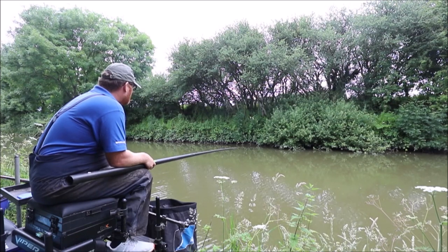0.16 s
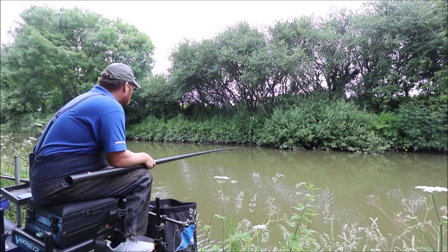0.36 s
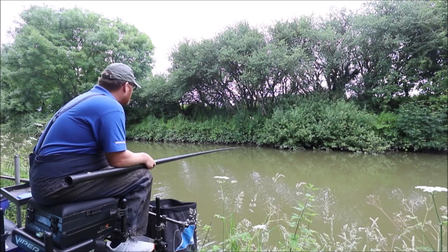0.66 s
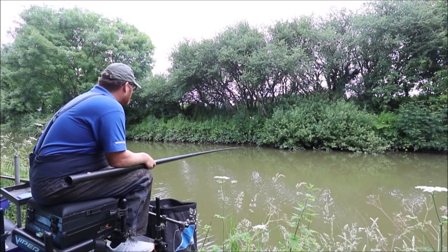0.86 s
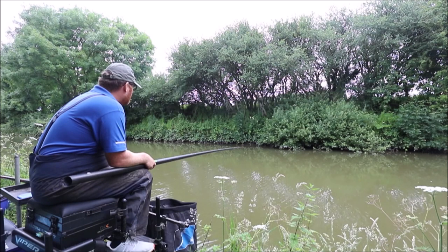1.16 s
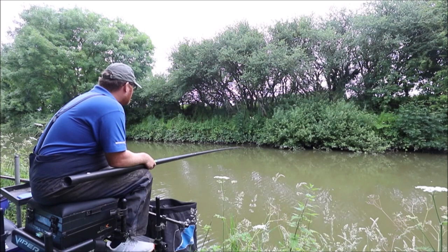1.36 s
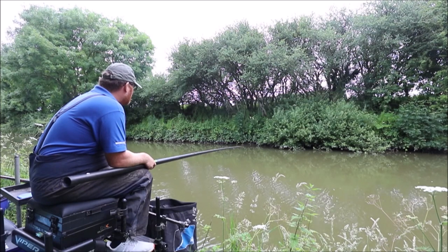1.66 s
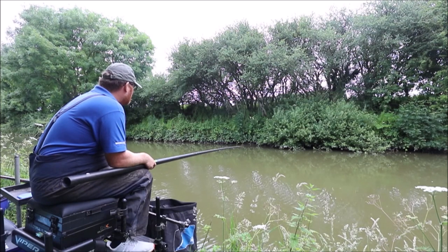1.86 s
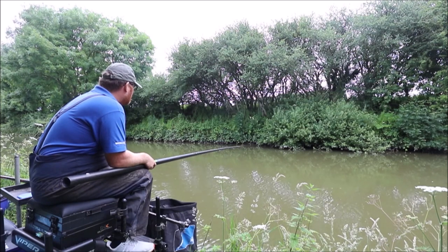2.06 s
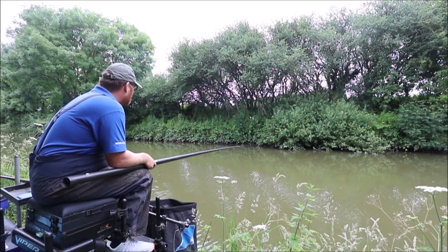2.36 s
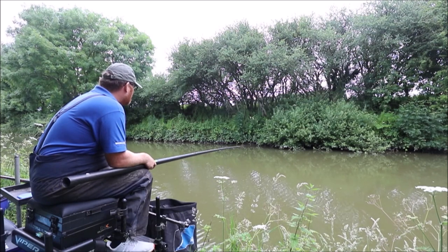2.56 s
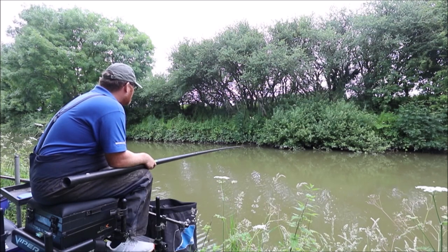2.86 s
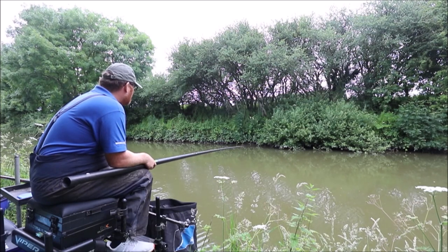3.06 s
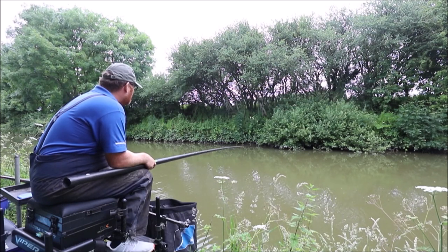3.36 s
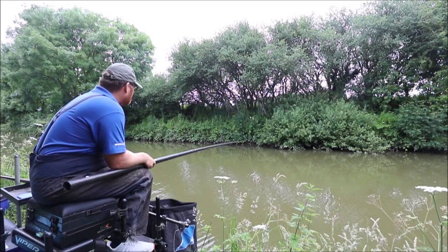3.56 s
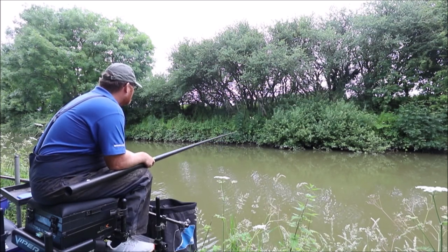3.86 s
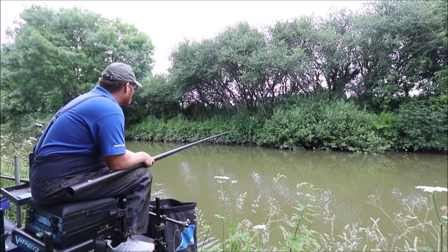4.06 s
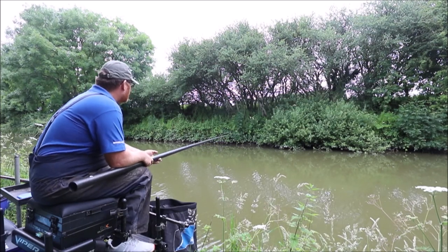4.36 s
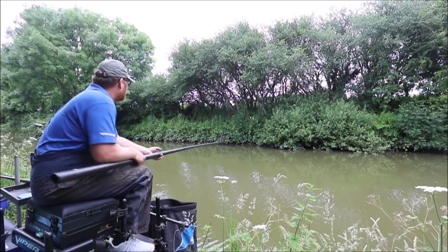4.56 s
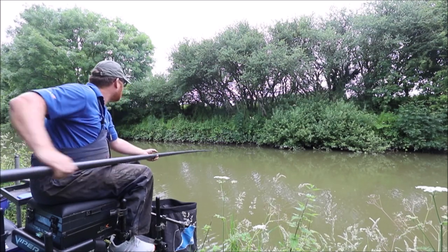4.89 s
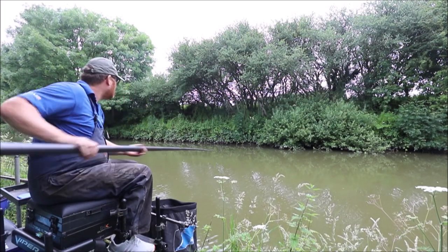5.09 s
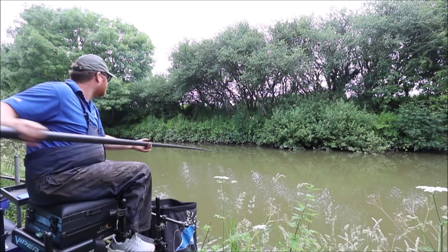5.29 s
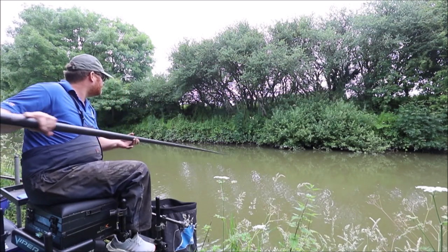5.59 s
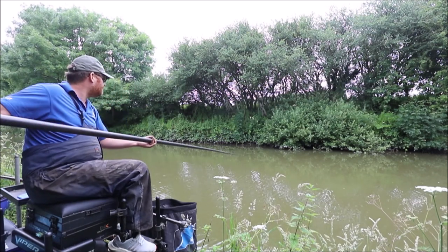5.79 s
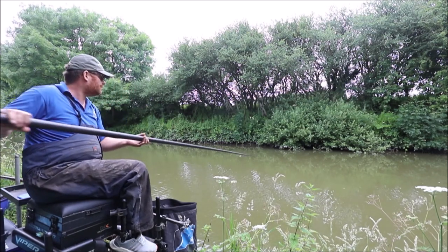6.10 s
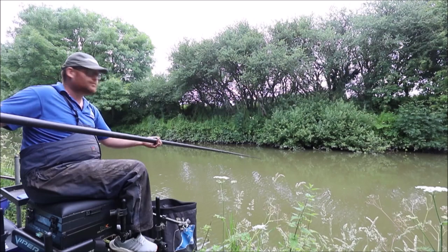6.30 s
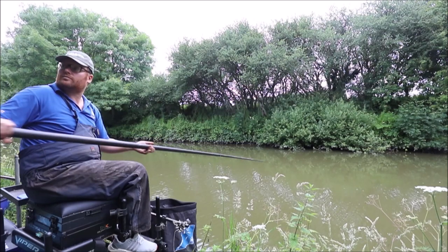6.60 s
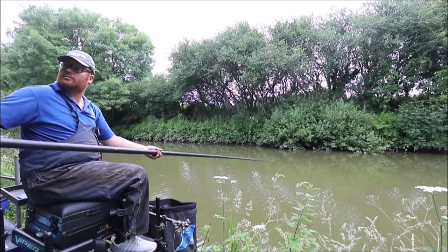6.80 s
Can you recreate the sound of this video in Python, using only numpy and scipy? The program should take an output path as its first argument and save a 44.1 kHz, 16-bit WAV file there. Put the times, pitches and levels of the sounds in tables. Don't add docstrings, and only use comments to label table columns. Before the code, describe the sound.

A quiet waterside with faint, steady far traffic, low rumble and a light breeze in leaves. From 0 to 0.9 s a small songbird gives short chirps, faint clicks, a lower whistle and high sliding notes. At 0.94 to 1.6 s comes an even trill of ten falling syllables, then quick twisting notes, a long fall near 2 s and a piercing held whistle at 2.15. A dry rattle of paired clicks runs 2.3 to 2.65, then four flick-and-fall phrases from 2.75 to 3.5, echoing off trees. Only background remains until about 4.4, when a pole is drawn into the hands with a soft hiss and a brief squeak at 4.7. Close overlapping rubbing strokes follow: strongest at 5.1, with a fast bright zip, and at 5.55, then softer swishes, grit ticks and small hollow rings, with a firmer last pull at 6.9.

```python
import sys
import numpy as np
from scipy import signal
from scipy.fft import rfft, irfft, dct, next_fast_len
from scipy.io import wavfile
from scipy.ndimage import uniform_filter1d, map_coordinates

SR = 44100
rng = np.random.default_rng(int(sys.argv[2]) if len(sys.argv) > 2 else 0)


def output_pcm(signal):
    pcm = np.clip(np.atleast_2d(signal).T, -1, 1) * 32767
    wavfile.write(sys.argv[1], SR, np.round(pcm).astype(np.int16))


def makeup_ratio(level_db):
    decades = np.asarray(level_db, float) / 20
    return 10 ** decades


N = 306054

# t/s, level/dB
TRAFFIC_LEVEL = [(0.0, -51), (1.6, -51.5), (4.8, -48.5), (6.94, -48)]
# f/Hz, density/dB
TRAFFIC_SPECTRUM = [(120, -14.5), (200, -8), (356, -3), (452, -4.5), (736, -4.5), (955, -6.5), (1270, -9),
                    (1540, -8.5), (1650, -8), (3000, -21), (3900, -20), (6600, -120)]
# f/Hz, density/dB
RUMBLE_SPECTRUM = [(12, -52), (20, -10), (48, -13.5), (61, 0), (107, 1.5), (134, -3), (162, 3), (246, -5.5),
                   (260, -12), (340, -35), (570, -120)]
# f/Hz, level/dB
ENGINE_TONES = [(113.0, -67.5), (721.4, -66.5)]
# t/s, level/dB
BREEZE_LEVEL = [(0.0, -66.5), (2.3, -63), (3.06, -60)]
# f/Hz, density/dB
BREEZE_SPECTRUM = [(1180, -36), (2000, -3), (2660, -3.5), (4200, -7), (5250, -6), (9200, -10.5),
                   (15000, -26.5), (15700, -18)]

# t/s, length/s, from/Hz, held/Hz, level/dB
WHISTLES = [
    (0.387, 0.11, 3696, 3807, -36.5),
    (0.785, 0.12, 5800, 5413, -24),
    (2.139, 0.12, 5800, 6664, -21.5),
]
# t/s, length/s, from/Hz, to/Hz, level/dB
CHIRPS = [
    (.085, 0.057, 3950, 3100, -33),
    (.187, .025, 4700, 4200, -29),
    (1.707, .028, 4780, 4220, -21.5),
]
# t/s, f/Hz, level/dB
TURNED_NOTES = [
    [(0, 4740, -25), (.007, 4790, -29), (.015, 4900, -37), (.028, 5080, -32), (.037, 5130, -46)],
    [(.53, 8300, -44), (.542, 7600, -32), (.558, 7400, -28), (.64, 7310, -25), (.74, 7200, -33)],
    [(.29, 5500, -36), (.3, 6150, -26), (.315, 6600, -23), (.335, 6500, -26), (.345, 6200, -35)],
    [(1.622, 6000, -45), (1.632, 7500, -31), (1.64, 7900, -30), (1.66, 6700, -23), (1.685, 7300, -28)],
    [(1.796, 6400, -34), (1.802, 5400, -27), (1.812, 5300, -27), (1.825, 5800, -21), (1.848, 6650, -26),
     (1.915, 6700, -27), (1.93, 6660, -36)],
    [(1.96, 5800, -38), (1.985, 4900, -22), (2.0, 4300, -25), (2.02, 3720, -26), (2.048, 3520, -25),
     (2.075, 3380, -36)],
    [(2.672, 6400, -36), (2.69, 7900, -30), (2.705, 7700, -26), (2.722, 7000, -27)],
]
# t after start/s, share of fall/0-1, level/dB
TRILL_SYLLABLE = [(-.013, .15, -16), (-.009, .3, -14), (-.004, .3, -28), (0, .05, -14), (.005, .19, -1.5),
                  (.011, .46, 0), (.017, .84, -6), (.024, 1, -14)]
# t after start/s, f/Hz, level/dB
CLICK = [(-.001, 7300, -6), (.0005, 6200, 1), (.002, 5150, -1), (.0035, 4500, -8)]
# t/s, level/dB
LEAD_CLICKS = [
    (.237, -49),
    (0.261, -39),
]
# flick/s, flick level/dB, fall end/s, fall level/dB
PHRASES = [
    (2.76, -28, 2.905, -23.5),
    (2.947, -27, 3.1, -24),
    (3.145, -27, 3.297, -24.5),
    (3.339, -28.5, 3.5, -27),
]
# t after start/s, f/Hz, level/dB
FLICK = [(0, 4420, -17.5), (.008, 5330, -4.5), (0.015, 5800, 5), (0.017, 5860, -22)]
# t after start/s, f/Hz, level/dB
RISE = [(0, 7290, -7), (.012, 7720, 6.5), (0.024, 7870, -15)]
# t from end/s, f/Hz, level/dB
FALL = [(-.056, 7800, -6), (-.04, 7250, -3), (-.03, 6600, -3), (-.02, 5600, 0), (-.01, 4800, -1.5),
        (0, 4400, -4), (.006, 4330, -14)]
# multiple, level/dB
OVERTONES = [(2, -35.5), (3, -40.5)]
# peak at share of length/0-1, loss half a length away/dB
CHIRP_SWELL = (.42, 13)
# peak/0-1, loss/dB
WHISTLE_SWELL = (0.43, 6.7)

# delay/s, level/dB
ECHOES = [(.001, -9), (.0033, -3), (.0043, -9), (.0058, -11), (.0138, -14), (.015, -14), (.031, -15),
          (.0344, -14), (.0366, -15)]
# f/Hz, t60/s
TREE_DECAY = [(3000, 0.36), (6000, 0.55), (12000, 0.76)]
# t60/s, initial level over far tail/dB
NEAR_BUSHES = (0.16, 7)

# t/s, hiss level/dB
LIFT = [
    (4.17, -68),
    (4.65, -33),
    (4.76, -55.5),
]
# grip/s, hardest/s, let go/s, hiss level/dB, flatness (1 pointed, 3 even)
STROKES = [
    (4.673, 4.879, 5.02, -28, 1.2),
    (5.022, 5.092, 5.245, -20, 3.6),
    (5.192, 5.312, 5.56, -29.5, 2.4),
    (5.325, 5.564, 5.67, -21, 1.64),
    (5.643, 5.776, 5.92, -28.5, 2.2),
    (5.845, 5.999, 6.12, -28.5, 2.6),
    (6.121, 6.225, 6.345, -26, 1.63),
    (6.356, 6.492, 6.62, -30.5, 2.1),
    (6.59, 6.724, 6.83, -30.5, 2.5),
    (6.79, 6.905, 7.06, -25.5, 1.75),
]
# f/Hz, density/dB
HISS_SPECTRUM = [(1470, -33), (2500, -18.5), (3590, -4), (5150, -7.5), (6050, -0.5), (8290, -1.5),
                 (9600, -3.5), (13600, -3.5), (15700, -7.5)]
# f/Hz, density/dB
TUBE_SPECTRUM = [(410, -27), (700, -16.5), (918, -15.5), (981, -10), (1140, -3.5), (1350, -6.5),
                 (2250, 3.5), (5000, 1), (6500, -25), (11000, -120)]
# start/s, fastest/s, end/s, top rib rate/Hz, level/dB
ZIPS = [
    (4.785, 4.9, 4.94, 1950, -45),
    (5.038, 5.135, 5.207, 4320, -28.5),
    (5.27, 5.305, 5.4, 2300, -39.5),
    (5.465, 5.555, 5.6, 3000, -32.5),
    (5.68, 5.76, 5.87, 3100, -46),
    (5.93, 5.98, 6.07, 1950, -50),
    (6.19, 6.27, 6.3, 2300, -47),
    (6.86, 6.92, 6.99, 2500, -51),
]
# multiple, level/dB
RIB_ORDERS = [(1, -.5), (1.5, -7), (2, 1.5), (3, -8), (4, -7)]
# t/s, f/Hz, level/dB
SQUEAK = [
    (4.672, 1750, -37),
    (4.69, 1690, -35),
    (4.71, 1580, -32),
    (4.725, 1930, -32),
    (4.74, 1640, -50),
]
# t/s, f/Hz, level/dB
TUBE_RINGS = [
    (5.74, 1520, -45),
    (6.25, 910, -44),
    (6.5, 918, -48),
    (6.5, 1690, -43),
    (6.58, 618, -51),
    (6.68, 1153, -40),
    (6.86, 1310, -43),
    (6.9, 1490, -41),
]

# f/Hz, width/Hz, depth/0-1
HOUSING_NOTCHES = [(9380, 46, 0.7), (13200, 96, .8)]
# t/s, survival bar over mean/dB
SPARSE_BLOCKS = [(.09, 5), (.26, 5), (1.262, 6), (1.732, 4), (2.178, 7), (2.245, 5), (2.928, 4), (3.718, 4),
                 (4.18, 4), (4.568, 7), (4.613, 7), (4.848, 7), (4.913, 7), (5.213, 7), (5.38, 7),
                 (5.449, 9), (5.46, 7), (5.53, 7), (5.898, 9), (5.909, 7), (6.004, 9), (6.015, 7),
                 (6.19, 7), (6.342, 7), (6.6, 6)]

SETTLE_S, SAG_HZ_PER_S = 0.0077, 150
ONSET_DB, ONSET_S = 20.5, 0.0043
TRILL_S, TRILL_EVERY_S, TRILL_DB = .939, .0699, -24
TRILL_TOP_HZ, TRILL_LOW_HZ = 5394, 3860
FIRST_HIGHER_HZ, HIGHER_KEEPS = 330, .68
RATTLE_S, PAIR_EVERY_S, SECOND_AFTER_S = 2.277, .0567, .0272
RATTLE_DB, FIRST_SOFTER_DB, SOFTER_KEEPS, SECOND_DB = -32.5, 5.5, 0.42, 1.3
RISE_AFTER_S, RISE_DB = .031, -32.5
BODY_DB, BODY_LAGS = -7, 0.32
IDLE_DB = -45
SLOW_RIBS_HZ, SLOW_SHARE = 1650, .4
EASING_DB_PER_S = 50
BRIGHT_RIBS_HZ = 3100


def unit(x):
    return x / np.sqrt(np.mean(x ** 2) + 1e-20)


def along(points, hz):
    f, v = np.transpose(points)
    return np.interp(np.log(hz + 1), np.log(f + 1), v)


def curves(rows):
    s, *cols = np.transpose(rows)
    return [np.interp(np.arange(N) / SR, s, c) for c in cols]


def wobble(rate_hz):
    knots = rng.standard_normal(int(N * rate_hz / SR) + 4)
    return map_coordinates(knots, [np.arange(N) * rate_hz / SR])


def phase(hz, rough):
    return 2 * np.pi * np.cumsum(hz * (1 + rough * wobble(300))) / SR


def filtered(x, response):
    m = next_fast_len(N + 8192)
    return irfft(rfft(x, m) * response(np.fft.rfftfreq(m, 1 / SR)), m)[..., :N]


def rush(spectrum, patchy_db, grainy_db):
    noise = rng.standard_normal(N) * makeup_ratio(grainy_db * wobble(1500))
    z = signal.stft(noise, nperseg=512)[2]
    field = uniform_filter1d(rng.standard_normal(z.shape), 6, 0)
    field = uniform_filter1d(field, 8, 1)
    x = signal.istft(z * makeup_ratio(patchy_db * unit(field)), nperseg=512)[1][:N]
    return unit(filtered(x, lambda hz: makeup_ratio(along(spectrum, hz))))


def glide(tables, edge_s):
    hz, gain = np.zeros(N), np.zeros(N)
    for rows in tables:
        s, f, db = np.transpose(rows)
        stop = s[-1] + edge_s
        i = np.arange(max(round(s[0] * SR), 0), min(round(stop * SR), N))
        t = i / SR
        fade = np.clip((t - s[0]) / edge_s, 0, 1) * np.clip((stop - t) / edge_s, 0, 1)
        hz[i] = uniform_filter1d(np.interp(t, s, f), round(edge_s * SR), mode="nearest")
        gain[i] = np.sqrt(2) * makeup_ratio(np.interp(t, s, db)) * fade
    return hz, gain


def air():
    swell_db = 0.72 * wobble(3.7)
    traffic = makeup_ratio(curves(TRAFFIC_LEVEL)[0] + 0.5 + swell_db) * rush(TRAFFIC_SPECTRUM, 1.5, 0.7)
    rumble = makeup_ratio(-59.5 + swell_db + 1.2 * wobble(2.0)) * rush(RUMBLE_SPECTRUM, 1.4, -2.0)
    drone = 0
    for hz, db in ENGINE_TONES:
        drone = drone + makeup_ratio(db + 3.0 + 2.2 * wobble(3.7)) * np.sin(phase(np.full(N, hz), .02))
    breeze = makeup_ratio(curves(BREEZE_LEVEL)[0] + 8.5) * rush(BREEZE_SPECTRUM, 2.0, 1.5)
    return traffic + rumble + drone + breeze


def hedge(x):
    hz, t, z = signal.stft(rng.standard_normal(SR), SR, nperseg=256)
    far = makeup_ratio(-60 * t / along(TREE_DECAY, hz)[:, None])
    near_t60_s, near_db = NEAR_BUSHES
    near = makeup_ratio(near_db - 60 * t / near_t60_s)
    tail = signal.istft(z * (far + near), SR, nperseg=256)[1]
    path = np.pad(makeup_ratio(-2.0) * tail / np.linalg.norm(tail), (round(.004 * SR), 0))
    path[0] = 1
    for delay_s, db in ECHOES:
        path[round(delay_s * SR)] += makeup_ratio(db)
    return signal.fftconvolve(x, path)[:N]


def note(s, length_s, pitch, db, swell):
    age = np.linspace(0, length_s, num=30)
    peak, loss_db = swell
    level = db - loss_db * (2 * (age / length_s - peak)) ** 2 - ONSET_DB * np.exp(-age / ONSET_S)
    return np.transpose([s + age, pitch(age), level])


def placed(shape, s, db):
    return [(s + d, f, db + g) for d, f, g in shape]


def notes():
    tones = []
    for s, n, a, b, db in WHISTLES:
        held = lambda t: b + (a - b) * np.exp(-t / SETTLE_S) - SAG_HZ_PER_S * t
        tones.append(note(s, n, held, db, WHISTLE_SWELL))
    for s, n, a, b, db in CHIRPS:
        slide = lambda t: a + (b - a) * t / n
        tones.append(note(s, n, slide, db, CHIRP_SWELL))
    return tones


def trill():
    tones = []
    for k in range(10):
        low_hz = TRILL_LOW_HZ + FIRST_HIGHER_HZ * HIGHER_KEEPS ** k
        shape = [(d, TRILL_TOP_HZ + share * (low_hz - TRILL_TOP_HZ), g) for d, share, g in TRILL_SYLLABLE]
        tones.append(placed(shape, TRILL_S + k * TRILL_EVERY_S, TRILL_DB))
    return tones


def rattle():
    clicks = list(LEAD_CLICKS)
    for k in range(14):
        pair, second = divmod(k, 2)
        s = RATTLE_S + pair * PAIR_EVERY_S + second * SECOND_AFTER_S
        db = RATTLE_DB - FIRST_SOFTER_DB * SOFTER_KEEPS ** k + second * SECOND_DB
        clicks.append((s, db))
    return [placed(CLICK, s, db) for s, db in clicks]


def phrases():
    tones = []
    for flick_s, flick_db, end_s, fall_db in PHRASES:
        tones.append(placed(FLICK, flick_s, flick_db))
        rise = placed(RISE, flick_s + RISE_AFTER_S, RISE_DB)
        tones.append(rise + placed(FALL, end_s, fall_db))
    return tones


def bird():
    song = list(TURNED_NOTES) + notes() + trill() + rattle() + phrases()
    hz, gain = glide(song, edge_s=0.0016)
    turn = phase(hz, 0.004)
    voice = np.sin(turn)
    for k, db in OVERTONES:
        voice = voice + makeup_ratio(db) * (k * hz / 15000) ** 2.8 * np.sin(k * turn) * (k * hz < SR / 2)
    return gain * makeup_ratio(1.23 * wobble(90)) * voice


def grains(rows, cycles):
    out, t = np.zeros(N + SR), np.arange(SR // 10) / SR
    for s, hz, db in rows:
        age = t * hz / cycles
        ring = np.e * age * np.exp(-age) * np.sin(2 * np.pi * hz * t)
        out[round(s * SR):][:len(t)] += makeup_ratio(db) * ring
    return out[:N]


def flecks(level_db):
    when, pitch, size = rng.random((3, 220))
    start_s = LIFT[0][0]
    s = start_s + when * (N / SR - start_s - .01)
    hz = 1200 * 5 ** pitch
    db = level_db[(s * SR).astype(int)] + along(TUBE_SPECTRUM, hz) - 9 - 2.5 * np.log(size + .08)
    return grains(zip(s, hz, db), cycles=17)


def press(t, grip, top, end, db, flat):
    away = np.where(t < top, (top - t) / (top - grip), (t - top) / (end - top))
    return db - (db - IDLE_DB) * np.minimum(away, 3) ** flat


def palm_hiss_db():
    t = np.arange(N) / SR
    strokes = makeup_ratio(np.max([press(t, *row) for row in STROKES], axis=0))
    return 20 * np.log10(makeup_ratio(curves(LIFT)[0]) + strokes)


def ribs():
    zips = []
    for start, top, end, top_hz, db in ZIPS:
        s = np.linspace(start, end, num=24)
        speed = np.sin(np.pi / 2 * np.interp(s, [start, top, end], [0, 1, 0]))
        level = db + 20 * np.log10(SLOW_SHARE + (1 - SLOW_SHARE) * speed)
        level = level - EASING_DB_PER_S * np.maximum(s - top, 0)
        zips.append(np.transpose([s, SLOW_RIBS_HZ + (top_hz - SLOW_RIBS_HZ) * speed ** .85, level]))
    hz, gain = glide(zips, edge_s=.012)
    shake = 42 / (hz + 500)
    tone = 0
    for k, db in RIB_ORDERS:
        flicker = makeup_ratio(db + 3.5 * wobble(120))
        bright = np.minimum(hz / BRIGHT_RIBS_HZ, 1) ** (2 * (k > 1))
        skin = 1 / (1 + (k * hz / 10500) ** 4)
        tone = tone + flicker * bright * skin * np.sin(k * phase(hz, shake))
    return gain * tone


def squeak():
    hz, gain = glide([SQUEAK], edge_s=0.0087)
    return gain * makeup_ratio(1.9 * wobble(120)) * np.sin(phase(hz, 0.088))


def pole():
    hiss_db = palm_hiss_db()
    body_db = BODY_DB - BODY_LAGS * (hiss_db + 31)
    skin = rush(HISS_SPECTRUM, patchy_db=1.5, grainy_db=0.5)
    tube = makeup_ratio(body_db) * rush(TUBE_SPECTRUM, patchy_db=4.5, grainy_db=1.0)
    palm = makeup_ratio(hiss_db) * (skin + tube)
    return palm + flecks(hiss_db + body_db) + grains(TUBE_RINGS, cycles=21) + ribs() + squeak()


def scene():
    mono = hedge(bird()) + pole() + air()
    return np.array([mono, mono])


def housing(hz):
    return np.prod([1 - depth / (1 + ((hz - c) / w) ** 2) for c, w, depth in HOUSING_NOTCHES], axis=0)


def sparse(x):
    x, size = x.copy(), 2048
    window = signal.windows.tukey(size, .85)
    for s, keep_db in SPARSE_BLOCKS:
        block = x[:, round(s * SR) - size // 2:][:, :size]
        lines = dct(block * window, 4, norm="ortho")
        usual = uniform_filter1d(np.abs(lines) ** .5, 300) ** 2
        usual = np.maximum(usual, .7 * np.median(usual))
        bar = usual * makeup_ratio(keep_db + np.repeat(rng.normal(0, 1.5, 64), 32))
        lines = np.where(np.abs(lines) < bar, 0, lines + .25 * bar * np.sign(lines))
        block[:] = block * (1 - window ** 2) + window * dct(lines, 4, norm="ortho")
    return x


def band_limit(x):
    return signal.sosfilt(signal.butter(12, 17070, fs=SR, output="sos"), x)


def record(dry):
    heard = filtered(dry, lambda hz: housing(hz) * (hz < 15830))
    return band_limit(sparse(heard))


dry = scene()
out = record(dry)
output_pcm(out)
```